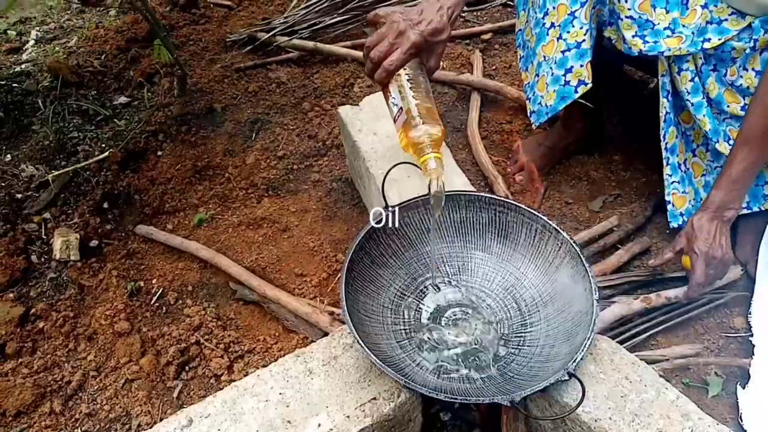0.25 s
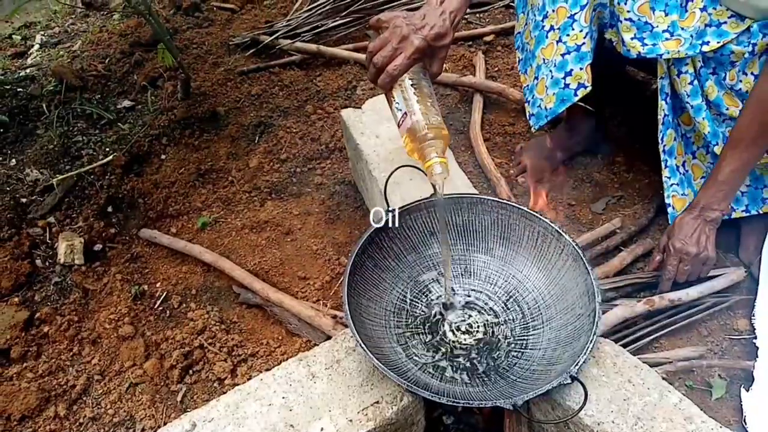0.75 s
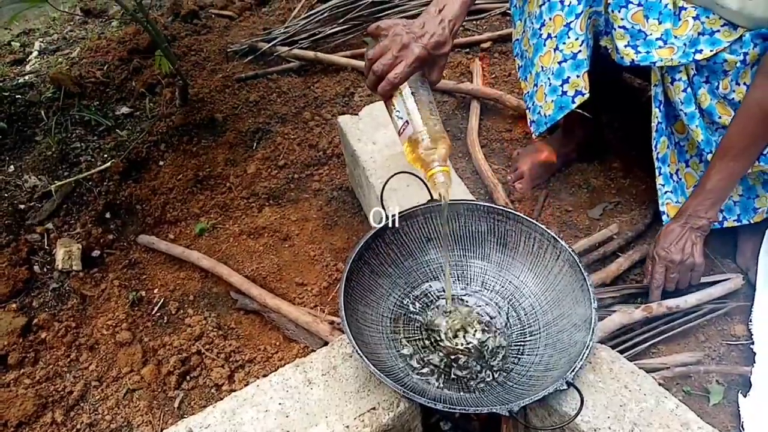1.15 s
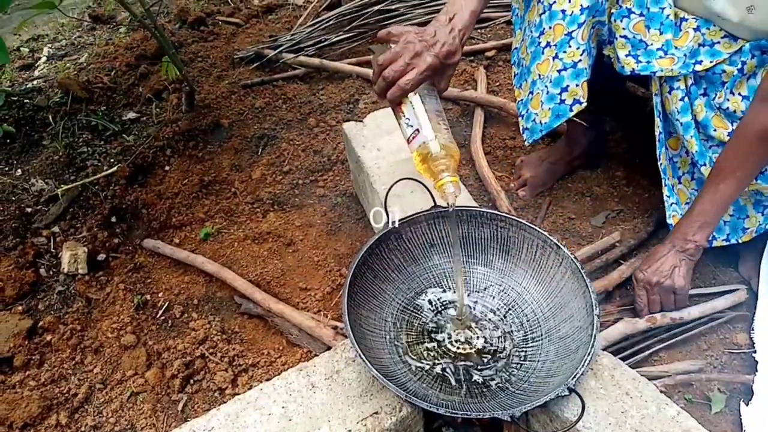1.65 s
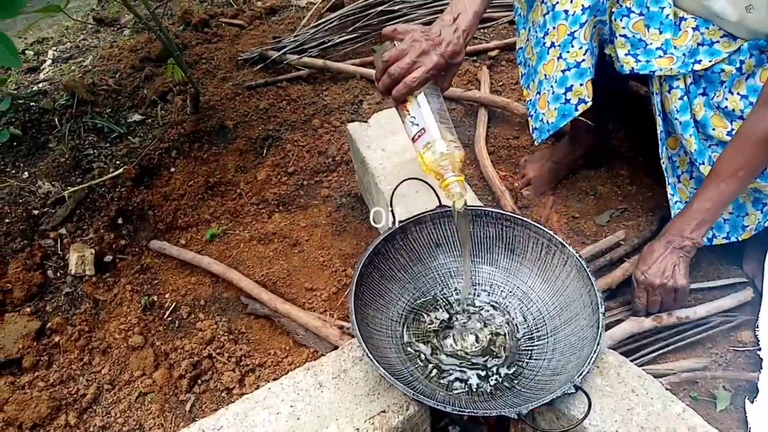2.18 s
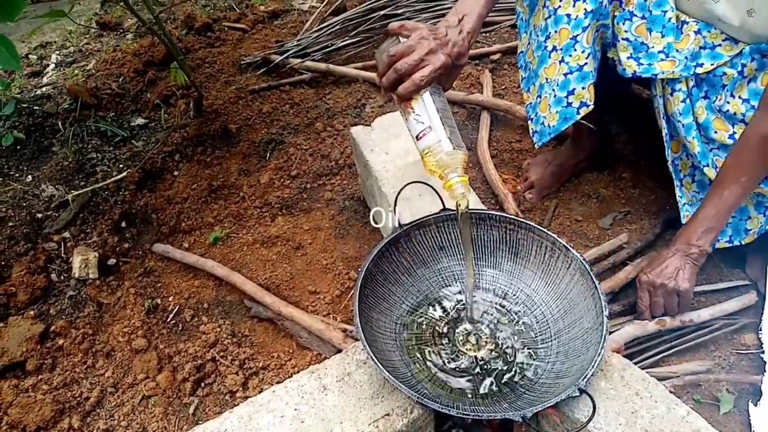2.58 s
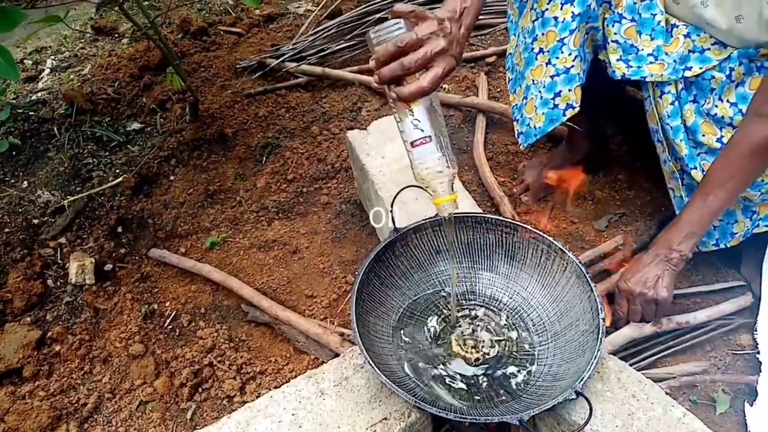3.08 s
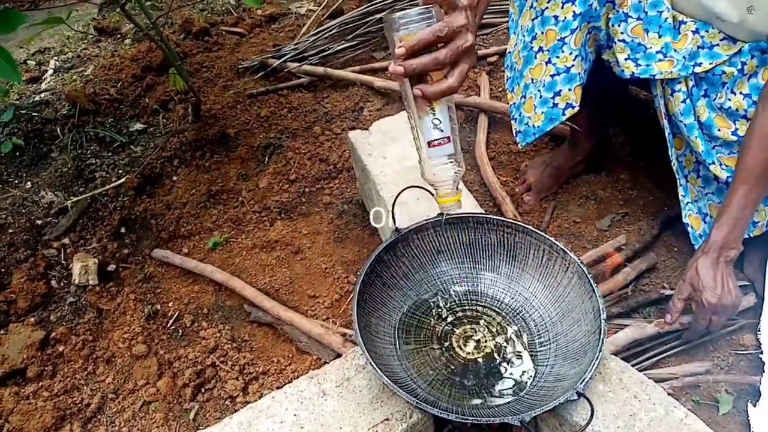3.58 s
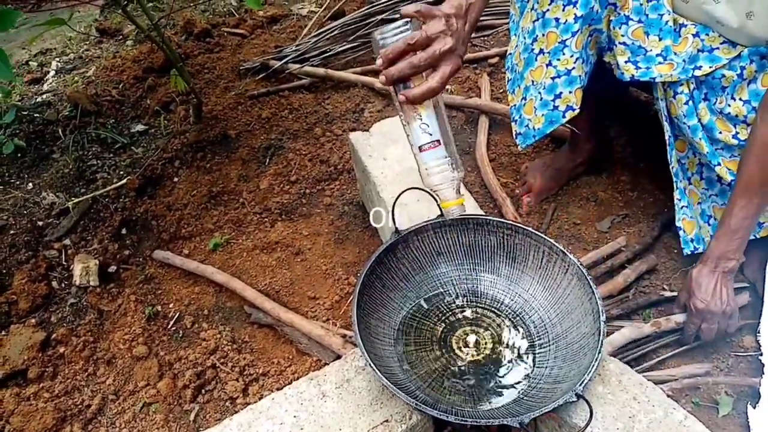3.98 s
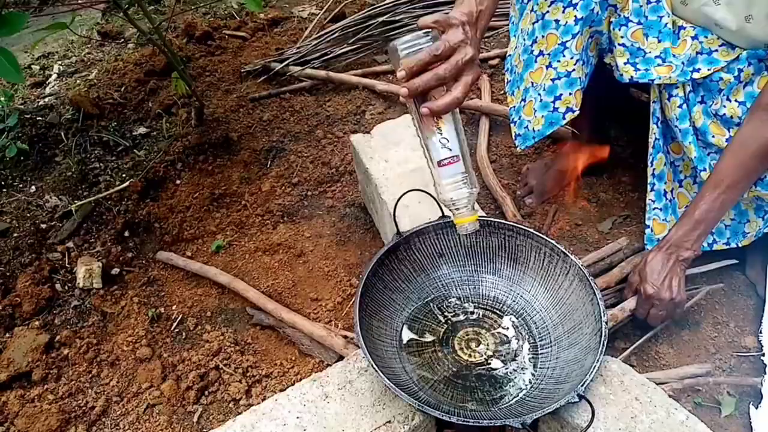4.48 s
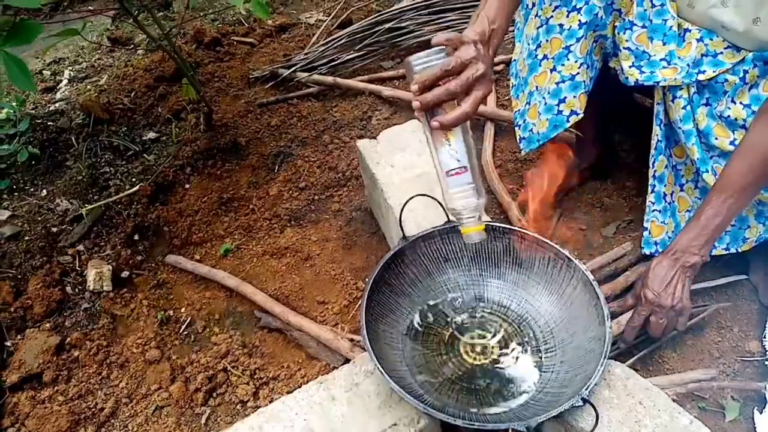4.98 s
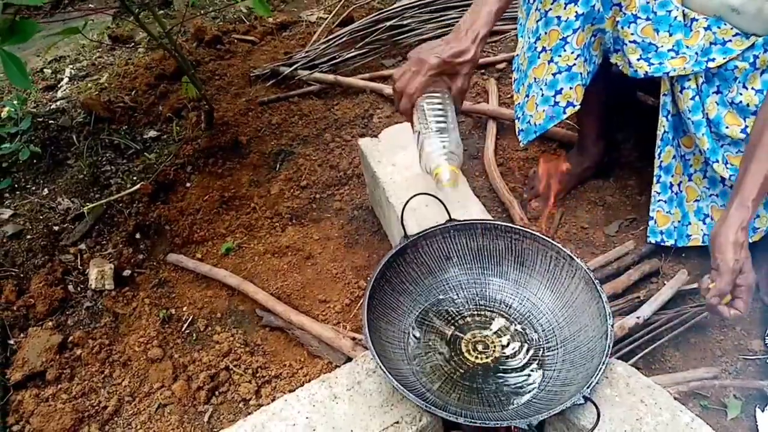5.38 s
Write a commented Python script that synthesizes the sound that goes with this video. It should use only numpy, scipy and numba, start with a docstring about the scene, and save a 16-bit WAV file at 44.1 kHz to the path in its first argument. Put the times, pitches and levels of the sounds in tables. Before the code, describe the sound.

Outdoors, very close and dry in stereo, oil pours into a hot metal wok over a wood fire. From the start to the end at about 5.6 seconds, irregular sharp pops burst roughly thirty to forty times a second at most, usually fewer, each a tiny bright puff with a quick rising note, mostly between 2 and 8 kHz. Fine seething crackle fills the gaps, surging after louder bursts. In the first 2.1 seconds short bubbly chirps and gliding tones flicker among them, mostly rising. Around 1.5 to 2.5 seconds the wok fills and its metallic tones sink; one dry tick strikes right at 2.4. From about 2.6 seconds pops leave clearer pings and a hollow hum near 1 kHz, more frequent after 4.2 seconds. The crackle is somewhat lower-pitched and knockier by 5 seconds. Faint low flames flutter and rumble unevenly below, with a thin wash of air.

```python
"""Vapour pockets burst in sharp pops as oil pours from a bottle into a hot metal wok, outdoors, over a wood fire.
Each burst is a rising note in a shaped puff of noise; its knock excites decaying wok modes,
whose tones sink as the oil deepens. Small bursts seethe between the large ones and the wok bottom hums.
Short gliding sines chirp while the oil pours, from bubbles or the ringing wok; the flames flutter low down
as filtered noise, with one dry tick; a pair of close microphones hears it all."""
import sys
import numpy as np
from scipy import signal
from scipy.fft import rfft, irfft, next_fast_len
from scipy.io import wavfile
from scipy.ndimage import uniform_filter1d
from numba import njit

SR = 44100
rng = np.random.default_rng(int(sys.argv[2]) if len(sys.argv) > 2 else 0)


def pcm_store(signal):
    """Save signal as 16-bit PCM."""
    levels = np.round(np.clip(np.atleast_2d(signal), -1, 1) * 32767)
    wavfile.write(sys.argv[1], SR, levels.astype(np.int16).T)


N = 249165  # samples in the scene

# large vapour bursts: (time of edge [s], level [dB], centre [Hz], knock on the wok wall [dB],
#   spray of treble [dB], left over right [dB], rise [ms], decay t60 [s])
LARGE_BURSTS = [(0.0149, -21, 6716, -62, -36, -2, 0.97, 0.04),
                (0.0248, -25.5, 8340, -55, -36.5, -9, 1.1, 0.042),
                (0.053, -24, 7860, -64, -32, 1, 0.77, 0.024), (0.0676, -28, 3530, -32, -31.5, 9, 1.3, 0.02),
                (0.119, -10.5, 5960, -51, -48, 0, 1.5, 0.036), (0.1274, -22, 5900, -61, -48, 7, 3.2, 0.07),
                (0.1768, -13.5, 4630, -42, -41, 2, 1.5, 0.051),
                (0.1763, -16, 6360, -31, -35, -7, 1.5, 0.027), (0.1992, -21, 4420, -51, -34, 9, 2.9, 0.029),
                (0.223, -5, 4520, -49, -63, 3, 3.7, 0.022),
                (0.2598, -16.5, 3800, -26, -63, -0.5, 1.5, 0.12),
                (0.2956, -7.5, 6000, -37, -58, 0, 1.1, 0.03), (0.3327, -21, 6200, -27, -61, -3, 1.5, 0.028),
                (0.3576, -13.5, 8100, -44, -43, -3, 1.3, 0.048),
                (0.3777, -10.5, 6000, -45, -46, 2, 1.9, 0.044),
                (0.3919, -15.5, 3540, -30, -57, -1, 1.8, 0.072),
                (0.424, -14.5, 6800, -54, -46, 3, 1.4, 0.018),
                (0.4536, -10.5, 4370, -45, -31, -1.5, 2.8, 0.038),
                (0.4737, -11, 5800, -51, -50, -3.0, 1, 0.026),
                (0.5008, -19.5, 5970, -40, -35.5, -7, 1.5, 0.037),
                (0.5131, -19, 4060, -26, -49, 1, 1.7, 0.094),
                (0.5543, -16.5, 8100, -33, -41, 1, 1.5, 0.038), (0.5696, -13, 5560, -44, -54, 7, 2, 0.04),
                (0.586, -14, 8000, -54, -57, -3, 0.71, 0.037), (0.6184, -30, 3100, -48, -35, 1, 1.1, 0.024),
                (0.6613, -11, 6530, -42, -37, -1, 1.4, 0.032),
                (0.7075, -36, 7600, -55, -33, 3.0, 1.5, 0.019),
                (0.7254, -8, 7500, -22, -44, -1, 2.8, 0.031), (0.7444, -23, 7720, -33, -36, 6, 1.9, 0.086),
                (0.7765, -8, 4260, -49, -40, -1, 0.56, 0.029),
                (0.7858, -21, 4400, -49, -61, -5, 1.5, 0.081),
                (0.8839, -27.5, 8300, -44, -36.5, 0, 1.6, 0.12), (0.9127, -21, 8300, -50, -39, 4, 2, 0.076),
                (0.9278, -23.5, 8300, -54, -36.5, -3, 3.4, 0.12),
                (0.9437, -11.5, 6150, -47, -35, 1, 4, 0.044),
                (0.9914, -34, 4320, -46, -39, 2.5, 1.5, 0.045),
                (1.0154, -16.5, 3600, -29, -41, -8, 2.3, 0.036),
                (1.0247, -16.5, 3260, -29, -50, 4, 1.5, 0.12),
                (1.102, -22.5, 7940, -43, -35, 7, 1.5, 0.058),
                (1.1248, -9.5, 6500, -52, -39, -1.5, 1.1, 0.052),
                (1.148, -11, 5700, -48, -40, -1, 1.5, 0.03), (1.2082, -17.5, 5900, -35, -36, 1, 1.3, 0.02),
                (1.2267, -8.5, 5530, -27, -51, 2, 1.2, 0.034),
                (1.2498, -19, 3180, -27, -45, -1, 1.5, 0.028),
                (1.2775, -19.5, 6400, -29, -27, 0, 0.81, 0.034),
                (1.286, -19.5, 4500, -36, -44, 1, 2, 0.034), (1.3044, -14, 6200, -46, -42, -1, 1.5, 0.03),
                (1.3328, -22, 7900, -34, -34, -7, 1.9, 0.023),
                (1.3592, -33, 8050, -51, -31, -6, 1.1, 0.018), (1.3726, -11, 5700, -63, -44, 6, 1.5, 0.028),
                (1.4002, -26, 5600, -50, -40, -2.0, 1.8, 0.12),
                (1.4413, -8, 3370, -27.5, -35, -4, 3.7, 0.035),
                (1.4745, -16.5, 4970, -27, -35, 3, 1, 0.057), (1.4934, -20, 5250, -34, -34, 3, 1.5, 0.095),
                (1.5327, -10.5, 3380, -27, -47, 3.5, 0.56, 0.04),
                (1.5534, -20, 3370, -23, -41, -3, 1.2, 0.04), (1.579, -22, 7900, -28.5, -37, 1, 1.5, 0.036),
                (1.5936, -14.5, 4290, -41, -32, -1, 1.3, 0.047),
                (1.6132, -14, 5960, -46, -35, 1, 0.9, 0.046), (1.62, -23.5, 6200, -46, -32, -2, 3.2, 0.078),
                (1.6476, -24, 7200, -46, -31, 6, 1.3, 0.03), (1.6575, -17, 7920, -49, -32, -2, 1.3, 0.055),
                (1.6792, -16.5, 3770, -27, -30, -2, 1.1, 0.013),
                (1.6972, -13.5, 6130, -40, -45, -2, 1.5, 0.042),
                (1.7138, -21, 7450, -45, -28.5, 4, 1.5, 0.025),
                (1.7486, -31, 8200, -48, -37, -10, 1.1, 0.016),
                (1.768, -17, 6370, -54, -38, -3, 1.3, 0.036), (1.786, -28, 6940, -44, -33, -5, 1.9, 0.025),
                (1.7987, -21, 7360, -35, -30, 4, 1.4, 0.04),
                (1.8194, -15.5, 2160, -36, -32, -1.5, 0.89, 0.05),
                (1.8418, -23, 6700, -24, -26, 5, 2.3, 0.032),
                (1.851, -18.5, 8200, -28.5, -37, 0, 2.2, 0.037),
                (1.8633, -15, 4460, -31, -34, -2.5, 1.7, 0.033),
                (1.8821, -15, 6840, -33, -30, 1, 1.9, 0.037), (1.8956, -22.5, 4860, -45, -38, 1, 2.5, 0.11),
                (1.922, -16.5, 4760, -34, -36, -2, 1.4, 0.035), (1.943, -14, 5700, -45, -37, 2, 1.2, 0.04),
                (1.9667, -12.5, 5800, -53, -34, -1, 0.76, 0.036),
                (1.9915, -16.5, 7550, -52, -37, -5, 1.5, 0.029),
                (2.0256, -8.5, 6000, -57, -28.5, 1, 1.9, 0.028),
                (2.0881, -14.5, 4830, -46, -40, 0, 0.79, 0.077),
                (2.128, -24, 6900, -51, -46, -2.5, 1.7, 0.04), (2.1642, -31, 7800, -53, -35, -3, 1.9, 0.04),
                (2.1881, -11.5, 5940, -47, -43, -3.5, 1, 0.034),
                (2.2109, -16.5, 3680, -19, -34, 5, 2.1, 0.026),
                (2.221, -11.5, 6200, -29, -43, 1, 2.1, 0.029),
                (2.2433, -20, 8000, -41, -41, -2.0, 1.4, 0.035),
                (2.2615, -17, 3500, -35, -36, -4, 1.7, 0.031),
                (2.2982, -11.5, 6500, -54, -49, -5, 1.6, 0.022),
                (2.3276, -4.5, 5950, -37, -48, -1, 3.1, 0.02), (2.3491, -22, 3330, -18, -36, 0, 1.5, 0.12),
                (2.3965, -23.5, 2270, -48, -29, 3, 2, 0.037), (2.418, -29, 8500, -57, -37, -10, 1.5, 0.016),
                (2.436, -12, 5300, -47, -38, -2, 1.1, 0.043), (2.4447, -36, 6110, -42, -52, 7, 1.2, 0.029),
                (2.4775, -11.5, 7100, -49, -42, -2, 1.5, 0.027),
                (2.5401, -13.5, 5650, -40, -49, 2.5, 1, 0.047),
                (2.5602, -18.5, 2180, -13, -54, 8.5, 1.5, 0.06),
                (2.615, -12.5, 5250, -33, -40, 3, 1.1, 0.04),
                (2.6355, -10.5, 5180, -36, -70, 1.5, 2.5, 0.045),
                (2.673, -28.5, 6060, -43, -45, 0, 1.2, 0.12),
                (2.7116, -27, 5900, -54, -43, -1.0, 1.4, 0.051),
                (2.725, -17, 5140, -48, -33, 1.5, 2, 0.064), (2.7598, -21, 6070, -46, -35, -1, 1.2, 0.027),
                (2.7734, -20.5, 8000, -54, -52, -10, 1.1, 0.02),
                (2.7845, -13.5, 6450, -54, -41, -6.5, 2.1, 0.033),
                (2.8661, -11, 3420, -29, -43, -1, 1.1, 0.033),
                (2.8916, -9, 4100, -17.5, -48, -1.5, 2.2, 0.035),
                (2.9209, -14, 2170, -25, -41, 1, 0.91, 0.052),
                (2.9209, -21, 4400, -21.5, -35, -1.0, 2.9, 0.076),
                (2.9637, -7.5, 6000, -64, -49, -2.5, 1.2, 0.02), (2.9816, -11, 6620, -52, -52, 4, 2, 0.033),
                (2.9958, -19, 4600, -36, -53, -1.5, 2.3, 0.059),
                (3.0104, -15.5, 3040, -23, -36, -7.5, 1.2, 0.028),
                (3.0439, -13, 2170, -25, -45, -0.5, 1.9, 0.035),
                (3.0574, -20.5, 2480, -25, -42, 2, 3.4, 0.04),
                (3.0868, -11.5, 5900, -35, -51, -1, 1.5, 0.042),
                (3.0942, -9, 6150, -44, -48, -6, 1.9, 0.025), (3.1144, -25, 8190, -41, -31, -1, 1.6, 0.024),
                (3.1694, -18, 3450, -31, -38, -6, 3.2, 0.051),
                (3.2048, -17.5, 8500, -34, -33, -2, 0.73, 0.022),
                (3.2222, -16.5, 3450, -41, -39, -3, 2, 0.032),
                (3.2325, -11, 4550, -43, -47, -2.5, 1.1, 0.043),
                (3.2588, -13, 6660, -40, -53, -4.0, 1.5, 0.043),
                (3.2832, -15.5, 3220, -39, -58, 3, 1, 0.029),
                (3.3074, -13.5, 6200, -45, -45, -3, 1.3, 0.034),
                (3.3418, -21.5, 5800, -50, -37.5, 1, 1.5, 0.035),
                (3.3712, -11, 4140, -25, -37, -0.5, 3.9, 0.042),
                (3.4244, -16, 3120, -26, -44, -0.5, 2.7, 0.087),
                (3.459, -12, 3320, -42, -32, -4.5, 0.82, 0.026),
                (3.4692, -16.5, 3150, -31.5, -37, -6, 3, 0.026),
                (3.4814, -22.5, 4470, -29.5, -40, -3, 1.7, 0.046),
                (3.5363, -13, 3500, -50, -29.5, -3.5, 1.1, 0.026),
                (3.57, -11.5, 3030, -25, -28, -3, 3.9, 0.026),
                (3.5959, -9, 3320, -21, -44, -1.0, 2.6, 0.036),
                (3.6029, -16.5, 3080, -38, -49, 1, 3, 0.057),
                (3.6534, -12.5, 6440, -32, -38, -3, 1.5, 0.017),
                (3.675, -8, 4130, -50, -35, -4.5, 1.7, 0.027), (3.7062, -10, 3060, -27.5, -46, 2, 1, 0.022),
                (3.722, -15, 3200, -35, -44, -5, 2.8, 0.045),
                (3.7476, -21.5, 3180, -19, -41, -1.5, 1.6, 0.04),
                (3.7824, -13, 4900, -25, -34.5, -2, 1.5, 0.057),
                (3.8095, -20.5, 7390, -36, -29.5, 0, 1.2, 0.023),
                (3.8692, -13.5, 6770, -43, -39, -2, 0.89, 0.028),
                (3.8903, -17, 6040, -44, -44, 1, 1.2, 0.039),
                (3.915, -18.5, 5800, -39, -63, -2, 0.99, 0.031),
                (3.96, -10, 3500, -27.5, -41, 0, 2.4, 0.047),
                (3.9918, -14, 5900, -47, -55, 2.0, 1.4, 0.028),
                (4.0007, -8.5, 6660, -58, -56, -2, 1.3, 0.025),
                (4.0502, -11, 6700, -63, -43, -3.5, 1.1, 0.036),
                (4.0704, -21.5, 3420, -44, -48, 1, 2.2, 0.034),
                (4.098, -19.5, 6950, -47, -28, -6, 0.86, 0.013),
                (4.1216, -13.5, 5900, -50, -56, 0, 1.9, 0.03),
                (4.1456, -12, 6300, -34, -30, -1.5, 1.5, 0.02), (4.171, -9, 5700, -33, -27, 0, 2.7, 0.02),
                (4.1917, -16, 4200, -38, -40, 1, 1.9, 0.12),
                (4.2268, -10.5, 5550, -46, -36, -2, 0.91, 0.038),
                (4.2331, -13, 3460, -30, -50, -2, 3, 0.046), (4.2613, -11, 5240, -36, -54, 0, 1, 0.03),
                (4.2946, -15, 2300, -25.5, -43, 0.5, 2.1, 0.04), (4.324, -23, 2230, -32, -57, 4, 1.8, 0.05),
                (4.34, -10.5, 5650, -36, -44, 0, 1.5, 0.03), (4.3623, -12.5, 3670, -49, -34, 2, 1.5, 0.04),
                (4.379, -19, 4300, -26, -47, 11, 1.2, 0.032),
                (4.3963, -11.5, 3420, -42, -47, -1, 1.1, 0.026),
                (4.4058, -13.5, 5670, -41, -40, -8, 1.4, 0.03),
                (4.4159, -10, 5900, -35, -45, 7, 1.5, 0.028), (4.4311, -14, 3120, -36, -48, -7, 2, 0.039),
                (4.465, -18.5, 4340, -36, -37, 1, 1.7, 0.037), (4.4824, -19, 5330, -53, -50, 2, 1.5, 0.027),
                (4.5086, -19.5, 3520, -36, -56, 2.5, 1.9, 0.023),
                (4.5221, -8, 4700, -28, -32.5, 0, 1.9, 0.029),
                (4.58, -24.5, 6200, -50, -36.5, -5, 1.3, 0.023),
                (4.6084, -14, 6900, -55, -32, 0.0, 2.6, 0.027),
                (4.6174, -11, 4160, -56, -49, -5.5, 1.9, 0.039),
                (4.6253, -16, 3210, -51, -48, 3, 2.2, 0.038), (4.6738, -17, 3030, -20, -52, -3.5, 1.3, 0.1),
                (4.7102, -13.5, 4340, -29.5, -41, 1, 0.82, 0.037),
                (4.7265, -16, 4180, -45, -55, -1, 1.1, 0.048), (4.7591, -9, 6540, -53, -46, -5, 1, 0.022),
                (4.792, -8.5, 3930, -33, -47, 1.5, 1.8, 0.039),
                (4.8224, -13.5, 8200, -51, -55, -2.5, 1.5, 0.025),
                (4.8382, -11, 7100, -50, -49, -3, 1.4, 0.02),
                (4.8549, -9.5, 4060, -27.5, -33, -2, 1.6, 0.025),
                (4.8878, -10, 6160, -46, -36, 4, 1.1, 0.025), (4.9092, -16, 7500, -23, -30, -2, 1.3, 0.022),
                (4.9328, -16, 8100, -34.5, -44, -8, 0.81, 0.02),
                (4.96, -9.5, 6540, -45, -49, 1, 1.9, 0.024), (4.9733, -19, 3980, -28.5, -39, 6, 2.2, 0.021),
                (4.9843, -13, 3350, -21, -44, -2.0, 2.6, 0.023),
                (4.9967, -15.5, 3300, -23.5, -45, 1, 1.5, 0.023),
                (5.019, -19, 5880, -22, -38, -1.5, 1.1, 0.049),
                (5.0463, -16.5, 5570, -39, -47, -1, 1.7, 0.04),
                (5.0625, -15, 3200, -45, -39, -2.0, 1, 0.029),
                (5.0736, -20, 3130, -46, -29, -4, 1.9, 0.015),
                (5.1015, -25, 8000, -55, -38, -2, 1.3, 0.034), (5.123, -12.5, 4040, -28, -43, 1, 1.5, 0.05),
                (5.1409, -12, 2280, -23, -44, -2, 2.2, 0.026), (5.151, -19, 2370, -42, -33, -6, 2.4, 0.018),
                (5.1607, -22, 2440, -43, -43, -6, 1.8, 0.026), (5.1773, -13, 4260, -28, -28, 2, 1.7, 0.023),
                (5.196, -16.5, 2960, -35, -38, 3, 2.1, 0.036),
                (5.2166, -16, 3240, -26, -27.5, 1, 2.1, 0.019),
                (5.2276, -13, 2970, -61, -35, -7, 3.2, 0.013),
                (5.2396, -18, 3150, -29, -34, -9, 2.3, 0.013),
                (5.2516, -21.5, 3250, -35, -45, 0.5, 1.8, 0.045),
                (5.2797, -11.5, 3030, -32, -65, -4, 0.71, 0.014),
                (5.2912, -9.5, 2980, -21.5, -54, -1.0, 2.2, 0.025),
                (5.3175, -12.5, 2360, -21.5, -57, -4, 1.5, 0.03),
                (5.3449, -14, 3960, -20, -53, -3, 1.5, 0.065),
                (5.3594, -17.5, 5830, -32, -37, 13, 1, 0.025),
                (5.3797, -39, 6500, -49, -53, 10, 1.5, 0.024),
                (5.3917, -17.5, 7300, -46, -55, -9, 0.85, 0.028),
                (5.422, -16, 5560, -25.5, -54, 2, 2.4, 0.024), (5.4384, -5, 6300, -27, -71, 1, 1.7, 0.016),
                (5.458, -14, 6280, -47, -51, 5, 3.4, 0.019), (5.4802, -16.5, 7460, -38, -60, 2, 1.8, 0.04),
                (5.5067, -14, 4170, -51, -44, 3, 1.1, 0.04), (5.554, -33, 6250, -59, -53, -6, 1.5, 0.03),
                (5.5692, -26, 6140, -53, -43, -2, 1.5, 0.029),
                (5.5898, -13, 3040, -24, -51, 0.5, 3.5, 0.058),
                (5.633, -13.5, 5660, -16, -45, 2, 1.8, 0.04)]
# modes of the wok wall: (nearly empty [Hz], full [Hz], level [dB], t60 before extra damping [s],
#   left over right [dB])
WALL_MODES = [(1930, 1886, -4, .16, 3), (2130, 2036, -6, .11, 1), (2330, 2278, -8, .1, 0),
              (2480, 2439, -10, .14, 0), (2560, 2538, -12, .09, 0), (2650, 2619, -15, .07, 0),
              (2760, 2720, -15, .07, 0)]
BURST_LEAD_S = 0.001005  # a burst starts just before its edge is heard


def pops():
    """Impulsive excitation: each large burst radiates directly and knocks the modes of the wall."""
    spits, knocks = np.zeros((2, 2, N))
    for s, db, hz, wall_db, spray_db, pan_db, rise_ms, t60 in LARGE_BURSTS:
        puff = burst(hz, rise_ms, t60, treble_db=spray_db - db, octaves=0.29, skirt_db=-12.5, same=0.1)
        pan = np.array([[pan_db], [-pan_db]]) / 2
        add(spits, s - BURST_LEAD_S, gain_of(db + pan) * puff)
        knock = pair(200, same=1.0) * np.hanning(200) / 8
        add(knocks, s, gain_of(wall_db) * knock)
    # the wall barely radiates below its lowest mode
    radiation = [(900, -24), (1650, -19), (1850, -0.5)]  # (frequency [Hz], gain [dB])
    wall = colour(ring(knocks, WALL_MODES, waver=0.0069), lambda f: read(radiation, f))
    return spits, wall


# overall spectrum of a puff: (frequency [Hz], relative density [dB per Hz])
PUFF_SPECTRUM = [(300, -80), (880, -47), (1600, -20.5), (2280, -6.5), (2760, -8.5), (3200, -2), (3820, -3),
                 (4180, 0.5), (5280, -2), (6140, 2.5), (8080, -4), (11000, -52.5), (14300, -63),
                 (22000, -120)]
# spectrum of the treble spray: (frequency [Hz], relative density [dB per Hz])
SPRAY_SPECTRUM = [(8000, -19), (9000, 0.5), (11000, -9.5), (13700, -19.5), (14400, -11), (15300, -4.5),
                  (15700, -34), (16300, -43)]


def burst(hz, rise_ms, t60, treble_db, octaves, skirt_db, same):
    """Vapour release: a pocket bursts with a rising note inside a ragged noise puff, and a treble spray."""
    size = 3072
    t = np.arange(size) / SR

    def bell(f):
        away = np.log2((f + 1) / hz) / octaves
        return read(PUFF_SPECTRUM, f) + np.maximum(-6 * away ** 2, skirt_db)

    phase = 2 * np.pi * hz * t * (0.97 + 3.6 * t) + 2 * np.pi * rng.random()
    note = np.sin(phase) * gain_of(-4.5 - 60 * t / 0.021)
    rise = np.sin(np.pi / 2 * np.minimum(t / (rise_ms / 1000), 1)) ** 2
    decay = gain_of(-60 * t / t60) + gain_of(-37 - 60 * t / 0.22)  # a main decay over a faint slow tail
    shape = rise * decay
    puff = (evened(colour(pair(size, same), bell)) + note) * shape
    spray = colour(pair(size, same=0.48), lambda f: read(SPRAY_SPECTRUM, f)) * shape
    both = evened(puff) + gain_of(treble_db) * evened(spray)
    return both * np.sqrt(np.mean(shape ** 2))


# small crackle before the stirring: (time [s], level [dB])
SEETHE_LEVEL = [(0.0, -31), (0.14, -29.5), (0.38, -30), (0.72, -33.5), (0.85, -30.5), (1.45, -28),
                (1.68, -32), (1.82, -31.5), (1.93, -30.5), (2.08, -27.5), (2.72, -37.5), (3.04, -37.5),
                (3.1, -36), (3.32, -34), (3.6, -30), (3.98, -38), (4.09, -37), (4.33, -30), (4.53, -33.5),
                (4.69, -36.5), (4.85, -39.5), (4.99, -29.5), (5.48, -30), (5.65, -22)]


def seethe():
    """Random superposition: many small bursts of scattered size and pitch, a few standing out."""
    out = np.zeros((2, N))
    for hz in np.geomspace(2300, 8800, 30):
        happens = rng.random(N) < 22 / SR  # 22 bursts a second at each pitch, on average
        sizes = gain_of(5.2 * np.minimum(rng.exponential(1, N), 3)) * happens
        grain = burst(hz, 1.56, 0.016, treble_db=-23.5, octaves=0.13, skirt_db=-18.0, same=0.028)
        out += signal.oaconvolve(sizes[None], grain[:, :2048], axes=1)[:, :N]
    out = evened(out) * gain_of(follow(SEETHE_LEVEL)) * stirring()
    radiation = [(1600, -54), (1850, -34)]  # (frequency [Hz], gain [dB])
    wall = colour(ring(out, WALL_MODES, waver=0.0045), lambda f: read(radiation, f))
    bottom = ring(out[[0, 0]], LOW_HUM_MODES + UPPER_HUM_MODES, waver=0.0052)
    return out + wall + gain_of(-30.5) * bottom


STIR_T60, CALM_DB = 0.13, -2.5  # settling time [s] and calm level [dB] of the small crackle


def stirring():
    """Exponential relaxation: every large burst stirs the oil up, and it settles towards calm."""
    kicks = np.zeros(N)
    for s, db, *rest in LARGE_BURSTS:
        add(kicks, s, gain_of([db]))
    lively = signal.lfilter([1], [1, -gain_of(-60 / (STIR_T60 * SR))], kicks)
    return evened(uniform_filter1d(evened(lively), 300) + gain_of(CALM_DB))


# filling of the wok: (time [s], oil depth [0-1], extra damping under the stream [dB per s];
#   a negative damping lengthens the ring)
FILLING = [(0, 0.08, 473), (1.2, 0.08, 553), (1.5, 0.29, 498), (2.1, 0.7, 302), (2.5, 0.88, -23),
           (2.75, 1, -2), (5.65, 1, 22)]
# moments when the ringing is cut short: (time [s], loss [dB])
RING_CUTS = [(0.408, 23), (1.663, 16), (1.753, 12), (2.304, 33), (2.743, 3), (3.11, 19), (3.853, 25),
             (4.102, 34), (4.538, 2.5), (4.916, 44)]
# the ringing drops in level just before each large burst, more before louder ones:
# drop before a full-scale burst [dB], in general and for the knocked bottom
RING_DROP_DB, BOTTOM_DROP_DB = 10, 3.5


def ring(knocks, modes, waver, drop_db=RING_DROP_DB):
    """Modal resonance under fluid loading: modes sink with depth, waver with slosh and decay at varying rates."""
    step = 32  # samples per update of the poles
    loss_db = follow(FILLING, column=2) / SR
    for s, db in RING_CUTS:
        add(loss_db, s, np.full(350, db / 350))
    for s, db, *rest in LARGE_BURSTS:
        # the drop takes about 5 ms and ends just before the burst
        add(loss_db, max(s - 0.006, 0), np.full(220, drop_db * gain_of(db) / 220))
    depth, loss_db = follow(FILLING)[::step], loss_db[::step]
    empty_hz, full_hz, db, t60, pan_db = np.transpose(modes)[:, :, None]
    slosh = np.array([slow(count=len(depth), size=45) for mode in modes])
    hz = (empty_hz + (full_hz - empty_hz) * depth) * (1 + waver * slosh)
    radius = gain_of(-60 / (t60 * SR) - loss_db)
    poles = radius * np.exp(2j * np.pi * hz / SR)
    gains = gain_of(np.hstack([db + pan_db / 2, db - pan_db / 2]).T.copy())
    return resound(knocks, poles, gains, step)


@njit
def resound(knocks, poles, gains, step):
    """Driven damped oscillators: a parallel bank of complex one-pole modes whose poles change over time."""
    out = np.zeros(knocks.shape)
    for channel in range(len(knocks)):
        for mode in range(len(poles)):
            state = 0j
            for n in range(knocks.shape[1]):
                state = state * poles[mode, n // step] + knocks[channel, n]
                out[channel, n] += gains[channel, mode] * state.imag
    return out


# modes of the rim: (nearly empty [Hz], full [Hz], level [dB], t60 before extra damping [s],
#   left over right [dB])
RIM_MODES = [(3100, 2720, -9, 0.06, 0), (3390, 3256, -17, 0.091, 0), (3570, 3340, -12.5, 0.12, 0.0043),
             (3670, 3300, -13.5, 0.11, 0), (4136, 3800, -13, 0.2, 0), (4600, 4330, -19, 0.17, 0)]


def rim(crackle):
    """Sympathetic resonance: all the crackle drives the modes of the rim."""
    drive = crackle[[0, 0]] + 0.73 * crackle
    return gain_of(-33.5) * ring(drive, RIM_MODES, waver=0.017)


# bursts that set the wok bottom humming: (time [s], low hum [dB], upper hum [dB])
BOTTOM_KNOCKS = [(2.56, -35, -40.5), (2.893, -52, -48.5), (3.044, -45.5, -52), (3.088, -64, -52),
                 (3.423, -43.5, -51), (3.48, -40.5, -49), (3.573, -62, -46), (3.602, -58, -41),
                 (3.783, -59, -44.5), (3.961, -52, -50), (4.144, -46, -54), (4.225, -50, -81),
                 (4.294, -37.5, -61), (4.378, -43, -49), (4.405, -39.5, -65), (4.47, -41, -58),
                 (4.674, -52, -43.5), (4.791, -48.5, -58), (4.854, -40.5, -55), (4.975, -74, -45),
                 (4.986, -36.5, -40.5), (5.062, -41, -52), (5.114, -94, -45), (5.141, -34.5, -39),
                 (5.196, -36, -40), (5.291, -44.5, -85), (5.322, -56, -52), (5.392, -53, -60),
                 (5.425, -36, -51), (5.493, -36.5, -58), (5.554, -49, -75), (5.633, -41, -59)]
# modes of the bottom, low then upper: (nearly empty [Hz], full [Hz], level [dB],
#   t60 before extra damping [s], left over right [dB])
LOW_HUM_MODES = [(700, 590, -21.5, 0.36, 8.5), (1289, 951, -3, 0.84, 0.5), (1300, 720, -39, 0.31, -13)]
UPPER_HUM_MODES = [(1805, 1305, 0, 0.34, 0)]


def hum():
    """Free vibration: the bottom of the wok hums on in its own modes after some bursts."""
    low, upper = np.zeros((2, 2, N))
    push = np.hanning(24) / 8
    for s, low_db, upper_db in BOTTOM_KNOCKS:
        add(low, s, gain_of(low_db) * push)
        add(upper, s, gain_of(upper_db) * push)
    tones = ring(low, LOW_HUM_MODES, 0.0035, BOTTOM_DROP_DB)
    tones = tones + ring(upper, UPPER_HUM_MODES, 0.0062, BOTTOM_DROP_DB)
    radiation = [(350, -14), (550, -4.0), (1500, 1.5), (2200, -18)]  # (frequency [Hz], gain [dB])
    return colour(tones, lambda f: read(radiation, f))


# short gliding tones while the oil pours, from bubbles or the ringing wok:
#   (time [s], length [s], start [Hz], end [Hz], nominal peak level [dB])
GLIDING_TONES = [(0.076, 0.11, 3410, 3480, -34.5), (0.149, 0.074, 3580, 4130, -30),
                 (0.813, 0.091, 2750, 3000, -35), (0.17, 0.04, 1946, 1730, -34),
                 (0.257, 0.044, 1794, 1850, -29), (0.325, 0.038, 1968, 1864, -30.5),
                 (0.388, 0.07, 1800, 1690, -36), (0.512, 0.027, 1875, 1930, -28),
                 (0.517, 0.048, 1226, 1230, -50), (0.629, 0.056, 1760, 1850, -36),
                 (.665, 0.063, 1225, 1180, -51), (0.727, 0.046, 1000, 1820, -41),
                 (0.794, 0.17, 1555, 1646, -44), (0.816, 0.091, 1130, 1230, -53),
                 (0.938, 0.05, 1570, 1590, -41), (0.987, 0.02, 575, 626, -46.5),
                 (1.023, 0.077, 1226, 1174, -42), (1.014, 0.041, 1750, 1820, -25),
                 (1.083, 0.039, 874, 1160, -41.5), (1.167, 0.093, 1144, 1220, -47.5),
                 (1.249, 0.028, 1020, 1710, -36), (1.446, 0.033, 802, 1056, -39.5),
                 (1.456, 0.067, 1044, 1130, -40), (1.519, 0.051, 1740, 1464, -32),
                 (1.564, 0.048, 1093, 1187, -35), (1.637, 0.037, 600, 1120, -44),
                 (1.725, 0.15, 1520, 1630, -38), (1.822, 0.027, 407, 483, -37.5),
                 (1.855, 0.042, 570, 906, -48), (1.903, 0.05, 600, 940, -50),
                 (2.078, 0.16, 1025, 977, -53.5), (1.991, 0.081, 3320, 3880, -38),
                 (2.081, 0.034, 1506, 1470, -43), (2.095, 0.047, 2150, 2140, -41),
                 (4.91, 0.0076, 1220, 1260, -37)]
HIGH_TONE_HZ = 1400  # tones starting above this pitch reach the right microphone slightly later


def pour_tones():
    """Frequency glide: short unsteady tones, mostly rising, from bubbles or the ringing wok; low and high apart."""
    out = np.zeros((2, N))
    for s, length, start_hz, end_hz, db in GLIDING_TONES:
        u = np.linspace(0, 1, int(length * SR))
        drifts = evened(uniform_filter1d(rng.standard_normal((2, 8000)), 200))
        wobble, flutter = drifts[:, :len(u)]
        hz = (start_hz + (end_hz - start_hz) * u ** 0.875) * (1 + 0.03 * wobble)
        swell = np.sqrt(np.sin(np.pi * u ** 0.5) + 1e-9) * gain_of(1.7 * flutter)
        tone = np.sin(2 * np.pi * np.cumsum(hz) / SR) * swell
        add(out[int(start_hz > HIGH_TONE_HZ)], s, gain_of(db) * tone)
    return out


# layers of the fire: (time [s], drone [dB], flutter [dB], wash [dB])
FIRE_LEVELS = [(0.0, -45, -56, -63), (0.19, -49.5, -50, -67), (0.3, -65, -63, -87), (0.36, -37.5, -60, -69),
               (0.52, -46.5, -61, -68), (0.99, -56.5, -55, -57), (1.15, -82, -70, -63),
               (1.27, -55, -54, -57.5), (1.7, -73, -65.5, -54.5), (2.17, -56, -56.5, -64),
               (2.26, -72, -62, -59), (2.45, -63, -48.5, -54.5), (2.55, -75, -64, -52),
               (2.67, -61, -52.5, -57), (2.83, -82, -59, -58), (3.18, -42.5, -54, -52.5),
               (3.27, -81, -60, -60), (3.37, -55, -57, -54.5), (4.12, -74, -57, -57),
               (4.22, -53.5, -57, -53), (4.31, -82, -56.5, -61), (4.45, -47, -52.5, -56),
               (4.55, -77, -58, -53.5), (5.65, -62, -55.5, -53.5)]
# spectrum of the flutter: (frequency [Hz], relative density [dB per Hz])
FLUTTER_SPECTRUM = [(12, -45), (32, -36), (64, -73), (90, 5.5), (150, 3.5), (290, -8.5), (426, -24),
                    (499, -60), (585, -13), (805, -26), (900, -4), (1170, -75), (1980, -120)]


def fire():
    """Amplitude-modulated noise: a lumpy flutter of flames, a fuzzy drone under it, a faint patchy wash of air."""
    lumps = slow(count=N, size=900)
    flutter = colour(pair(N, same=0.96), lambda f: read(FLUTTER_SPECTRUM, f))
    flutter = evened(flutter * gain_of(3.6 * lumps))
    # a narrow band about 80 Hz
    drone = colour(pair(N, same=0.69), lambda f: -17 * np.log10(1 + ((f - 80) / 9) ** 2))
    drone = evened(drone * gain_of(3.4 * lumps))
    # (frequency [Hz], relative density [dB per Hz])
    air = [(200, -33), (350, -1.5), (600, 4.0), (800, -3.5), (1500, 10.5), (2500, -45)]
    wash = colour(pair(N, same=0.053), lambda f: read(air, f))
    wash = evened(wash * gain_of(5.5 * slow(count=N, size=1200)))
    mix = drone * gain_of(follow(FIRE_LEVELS)) + flutter * gain_of(follow(FIRE_LEVELS, column=2))
    return mix + gain_of(follow(FIRE_LEVELS, column=3)) * wash


# a dry tick on the right microphone: (time [s], nominal peak level [dB])
DRY_TICK = (2.4385, -10)


def tick(mix):
    """Transient decay: one sharp exponential pulse with a weak slower undershoot, right microphone only."""
    s, db = DRY_TICK
    t = np.arange(400)  # in samples
    add(mix[1], s, gain_of(db) * (np.exp(-t / 12) - 0.075 * np.exp(-t / 70)))


def gain_of(db):
    """Logarithmic level: dB to amplitude gain."""
    return 10 ** (np.asarray(db) / 20)


def evened(x):
    """Normalisation of effective value: scales to rms 1."""
    return x / np.sqrt(np.mean(x ** 2) + 1e-20)


def read(points, hz):
    """Logarithmic pitch scale: interpolates a spectrum along log frequency."""
    f, value = np.transpose(points)
    return np.interp(np.log(hz + 1), np.log(f + 1), value)


def follow(curve, column=1):
    """Linear interpolation in time: one column of a curve, sample by sample."""
    return np.interp(np.arange(N) / SR, *np.transpose(curve)[[0, column]])


def add(mix, s, sound):
    """Superposition: adds a sound in place at time s, cut at the end of the mix."""
    part = mix[..., round(s * SR):][..., :sound.shape[-1]]
    part += sound[..., :part.shape[-1]]


def colour(x, db_of_hz):
    """Spectral shaping: filters by a dB rule over frequency."""
    n = next_fast_len(x.shape[-1])
    gains = gain_of(db_of_hz(np.fft.rfftfreq(n, 1 / SR)))
    return irfft(rfft(x, n) * gains, n)[..., :x.shape[-1]]


def pair(size, same):
    """Partial coherence: noise for two microphones with correlation `same` (0-1)."""
    a, b = rng.standard_normal((2, size))
    return np.array([a, same * a + np.sqrt(1 - same ** 2) * b])


def slow(count, size):
    """Low-pass randomness: smooth drift of rms 1, averaged twice over `size` points."""
    once = uniform_filter1d(rng.standard_normal(count), size)
    return evened(uniform_filter1d(once, size))


def late(sound, count):
    """Arrival-time difference: the right channel lags by `count` samples."""
    sound = sound * np.ones((2, 1))
    return np.array([sound[0], np.roll(sound[1], count)])


# samples by which the right microphone hears each group of sounds late
CRACKLE_LATE, WALL_AND_HIGH_LATE, HUM_AND_LOW_LATE, FIRE_LATE = 41, 39, 35, 55


def scene():
    """Superposition of sources: crackle, wok, pour tones, fire and one tick, with lags between microphones."""
    spits, wall = pops()
    low_tones, high_tones = pour_tones()
    crackle = spits + seethe()
    crackle = crackle + rim(crackle)
    mix = late(crackle, CRACKLE_LATE)
    mix = mix + late(wall + high_tones, WALL_AND_HIGH_LATE)
    mix = mix + late(hum() + low_tones, HUM_AND_LOW_LATE)
    mix = mix + late(fire(), FIRE_LATE)
    tick(mix)
    return mix


# balance of the microphones: (frequency [Hz], left over right [dB])
MICROPHONE_BALANCE = [(60, 3.5), (160, 4.5), (740, 6.5), (1220, 4.5), (2010, 1), (3330, -1), (5500, -1.5),
                      (9080, -6), (15000, -16)]
BAND_LIMIT_HZ = 16350


def record(dry):
    """Transducer response: left fuller and duller than right, loud pops saturate, then a low-pass band limit."""
    left = colour(dry[0], lambda f: read(MICROPHONE_BALANCE, f) / 2)
    right = colour(dry[1], lambda f: -read(MICROPHONE_BALANCE, f) / 2)
    ceiling = 0.95  # of full scale
    both = ceiling * np.tanh(np.array([left, right]) / ceiling)
    low_pass = signal.firwin(511, BAND_LIMIT_HZ, window=("kaiser", 9), fs=SR)
    return signal.oaconvolve(both, low_pass[None], "same")


dry = scene()
out = record(dry)
pcm_store(out)
```